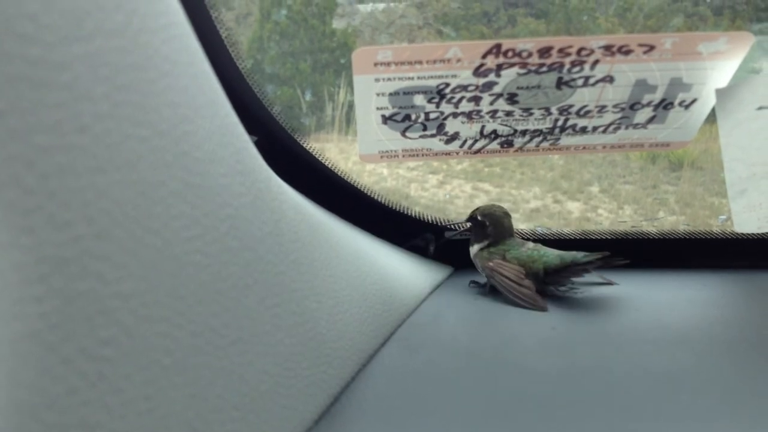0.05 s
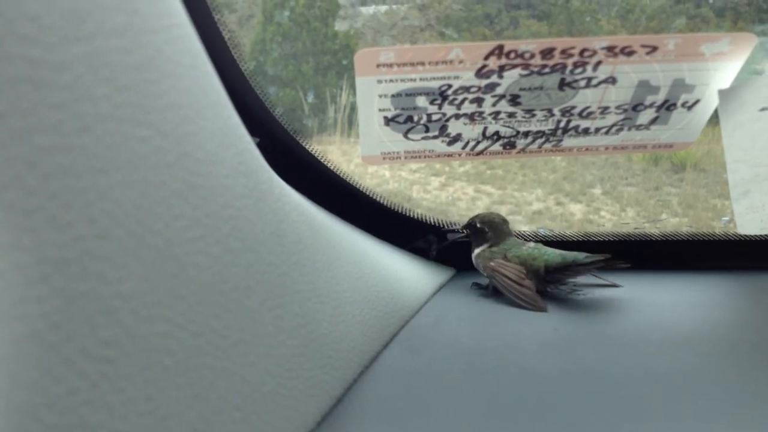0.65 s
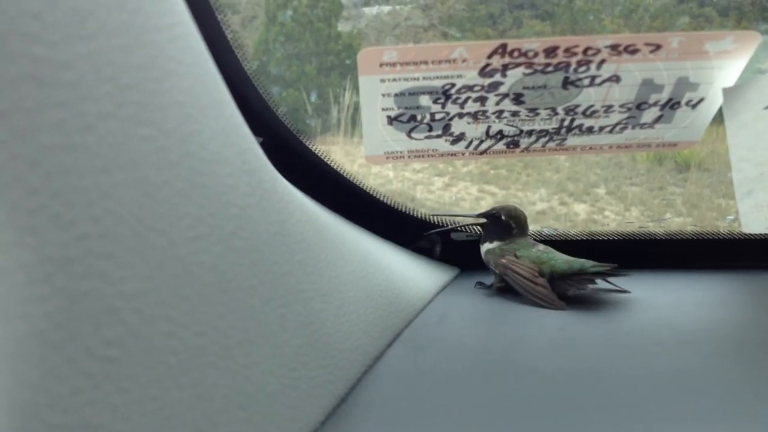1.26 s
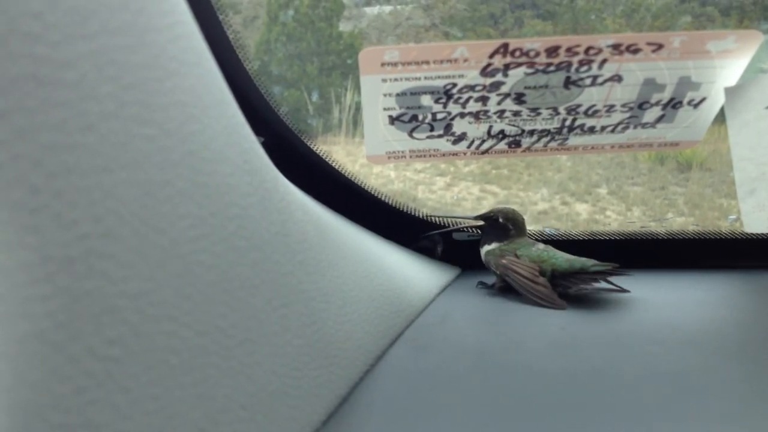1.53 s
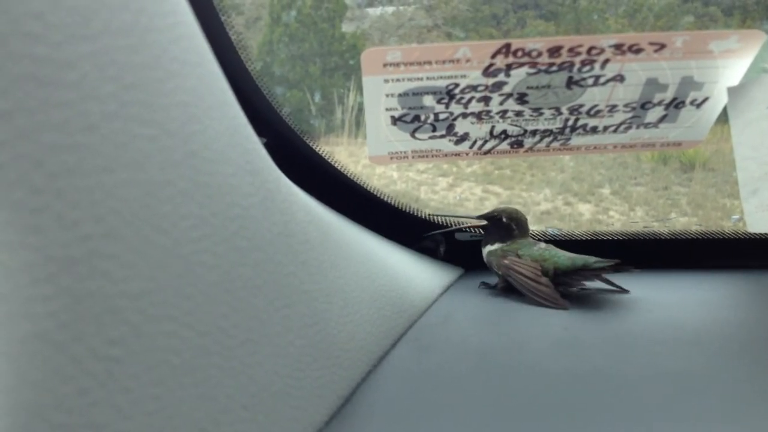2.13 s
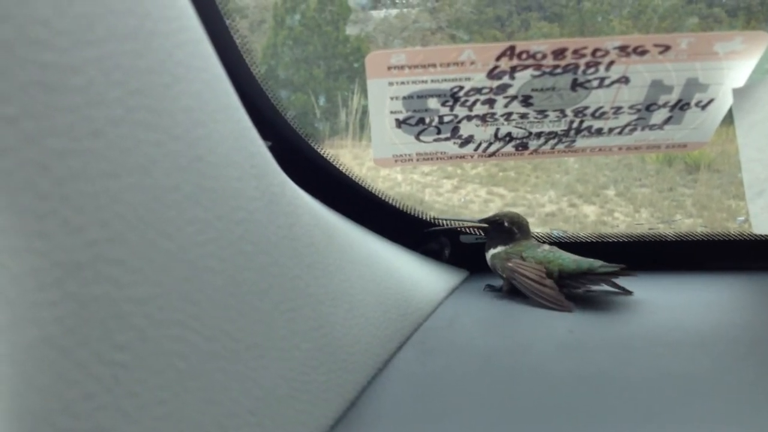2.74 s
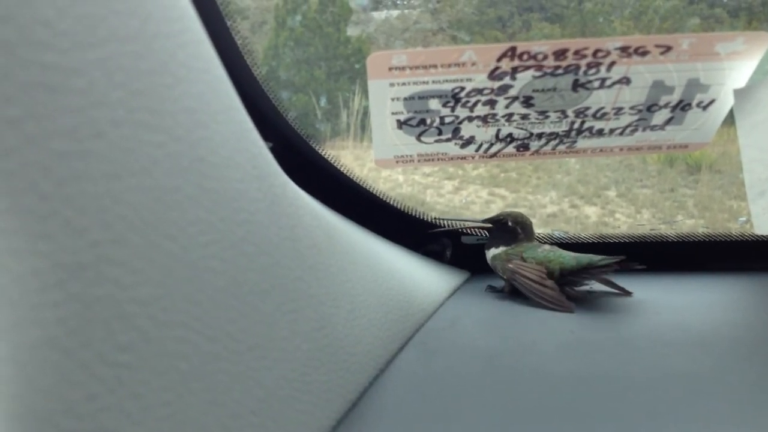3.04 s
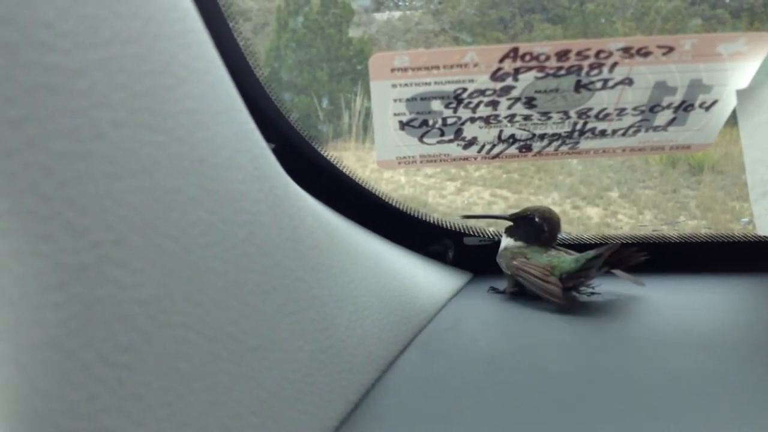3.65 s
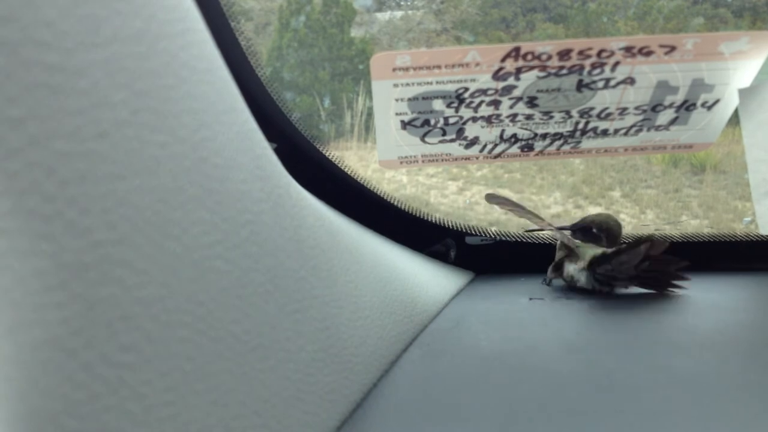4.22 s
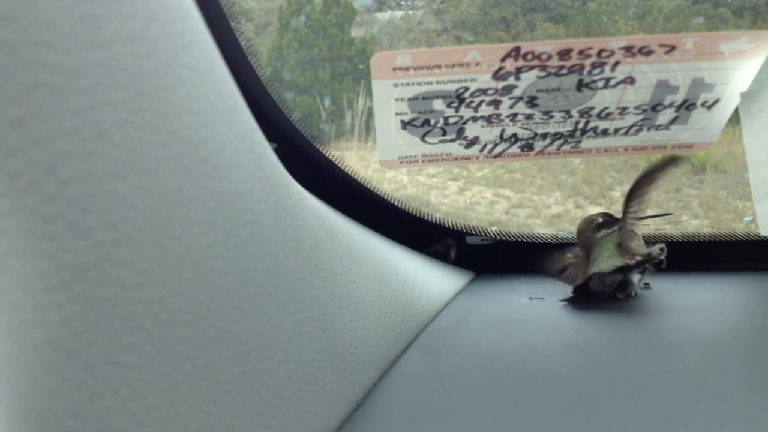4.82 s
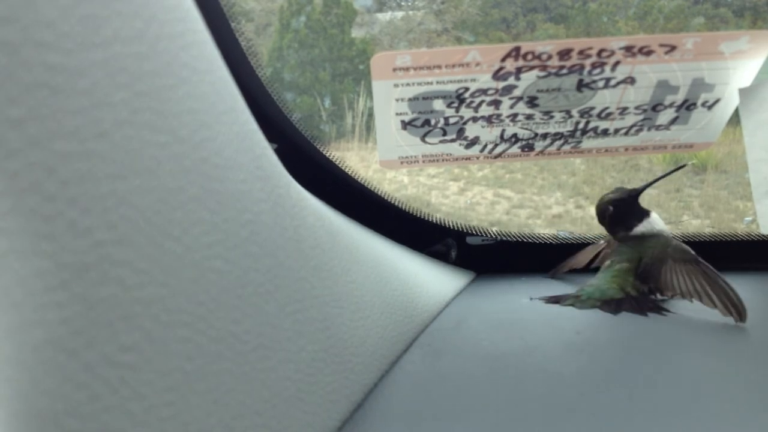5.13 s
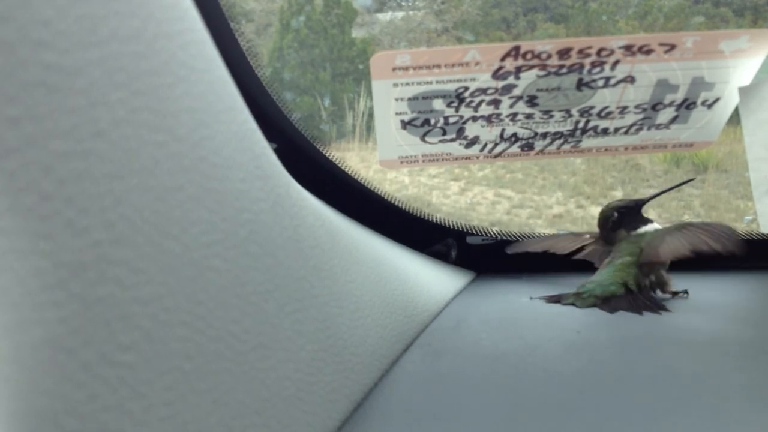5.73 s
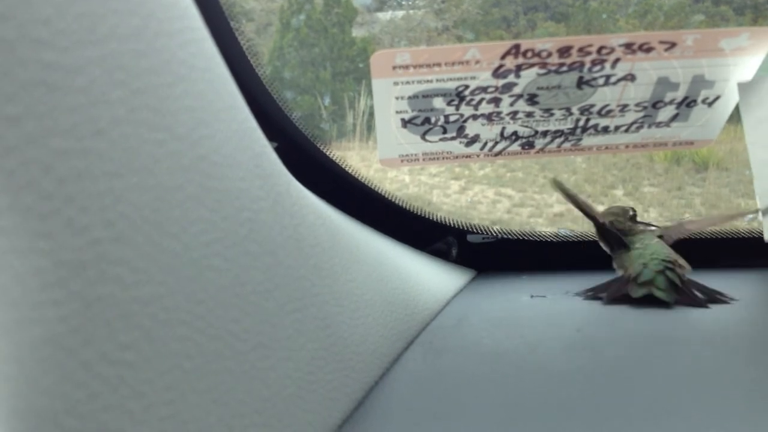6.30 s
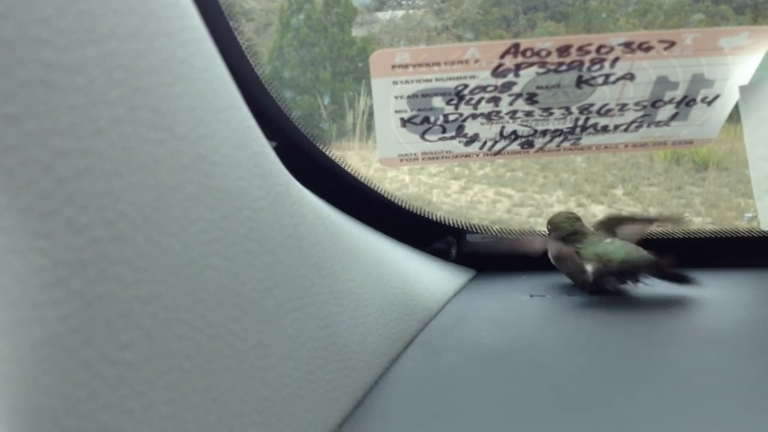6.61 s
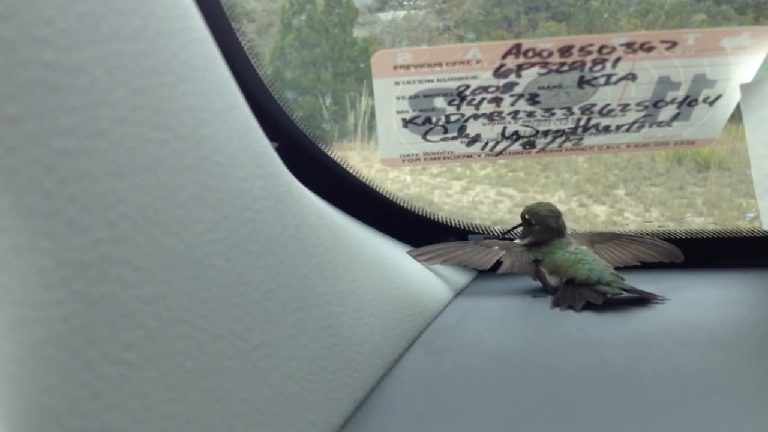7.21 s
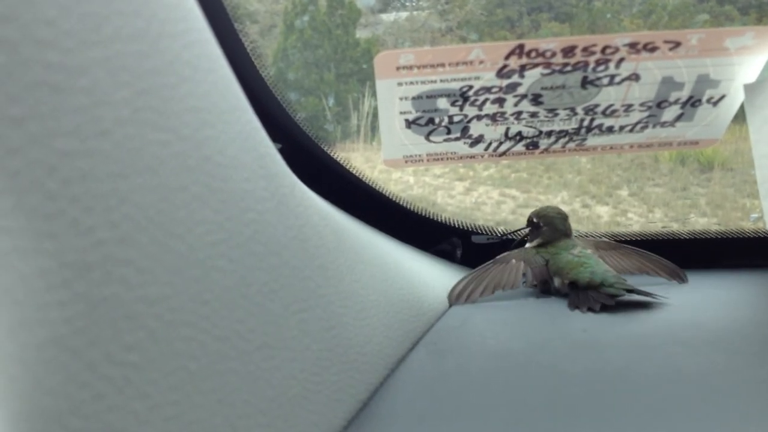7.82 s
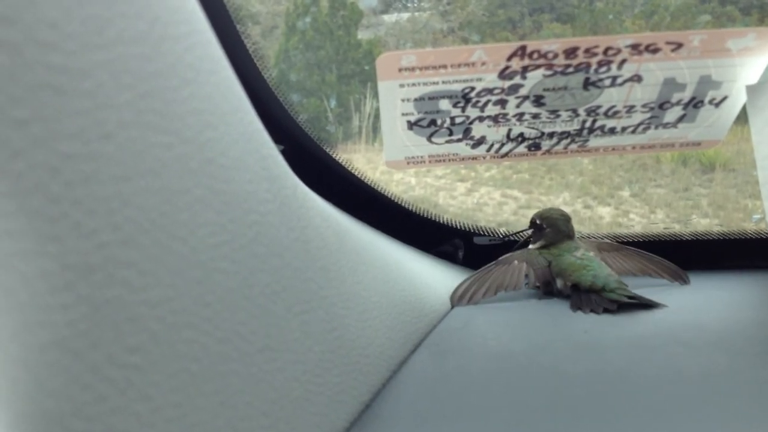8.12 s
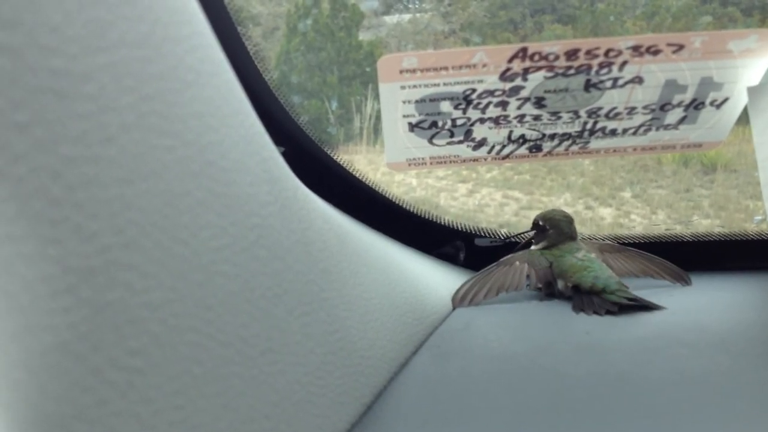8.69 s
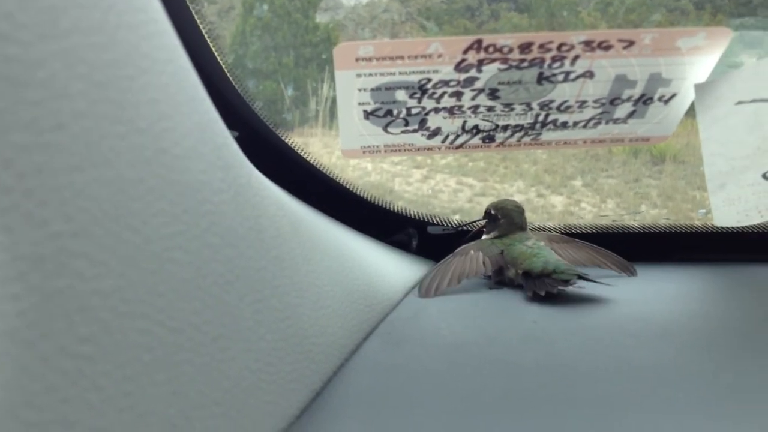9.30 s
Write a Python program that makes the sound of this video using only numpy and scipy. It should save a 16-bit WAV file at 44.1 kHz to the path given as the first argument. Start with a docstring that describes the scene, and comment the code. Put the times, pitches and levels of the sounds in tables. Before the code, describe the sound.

Faint birdsong outside a quiet car, then a trapped hummingbird flutters against plastic and glass in two bouts and settles.

```python
"""Inside a car, the microphone close to a hummingbird trapped behind the windscreen.
First a quiet outdoor rumble, songbirds outside smeared by the cabin, and a few faint rasps and chips.
Near four seconds the feathers shuffle and the bird beats its wings in bouts on the dashboard: each beat
hums and pushes air, feathers brush the trim on both strokes, wing tips and bill tap plastic and glass.
From about seven seconds it settles, and the songbirds outside carry on."""
import sys
import numpy as np
from scipy import signal
from scipy.fft import rfft, irfft
from scipy.io import wavfile
from scipy.ndimage import uniform_filter1d

SR = 44100
rng = np.random.default_rng(int(sys.argv[2]) if len(sys.argv) > 2 else 0)


def master(y):
    """Save y as 16-bit WAV."""
    cut = np.clip(np.atleast_2d(y).T, -1, 1)
    pcm = np.round(cut * 32767)  # scale
    wavfile.write(sys.argv[1], SR, pcm.astype(np.int16))


N = 421155
T = np.arange(N) / SR

# Hiss and rumble around the car, and the blur of far songs. Each row: frequency in Hz, relative dB.
HISS_COLOUR = [(25, -16.5), (80, -13.5), (118, -1.5), (150, -3.5), (210, 2), (290, -3), (520, -4.5),
               (1000, -7), (2400, -10), (2950, -10.5), (3600, -11), (7000, -12), (9900, -18), (13500, -13),
               (15400, -14.5)]
RUMBLE_COLOUR = [(40, -32), (90, -17.5), (125, -3), (210, 2), (320, -3), (600, -19), (2000, -20)]
CHORUS_COLOUR = [(1000, -31.5), (1700, -13), (2500, -11), (2850, 5), (3150, -10.5), (3700, -15),
                 (6000, -28.5)]
# How the rumble and the blur swell. Each row: time in seconds, level in dB.
RUMBLE_LEVEL = [(0, -79), (.7, -71.5), (1.5, -78), (2.3, -77.5), (3.2, -87), (5.5, -85), (7.4, -80),
                (9.5, -80.5)]
CHORUS_LEVEL = [(0, -87), (.8, -77.5), (2.2, -77.5), (3.2, -85.5), (6.9, -83.5), (7.4, -76), (8.3, -73.5),
                (8.8, -82)]

# Short notes near the car.
# Each row: start and length in seconds, first, middle and last pitch in Hz, mid-note level in dB.
NOTES = [(.02, 0.17, 2864, 2810, 2790, -75.5), (.11, .08, 4000, 3630, 3380, -77),
         (0.314, 0.063, 5150, 4980, 4914, -69.5), (0.446, 0.049, 4000, 3600, 3430, -72.5),
         (0.393, 0.0284, 2241, 2220, 2190, -65), (0.506, 0.0432, 2207, 2210, 2152, -56),
         (0.575, 0.0355, 2204, 2030, 2140, -60), (0.635, 0.018, 2093, 2180, 2264, -54),
         (1.268, 0.051, 2760, 3170, 3450, -62), (4.331, 0.0272, 3104, 3820, 2854, -54),
         (4.902, 0.03284, 5425, 6400, 5595, -58.5), (6.991, 0.031, 4310, 3750, 3420, -59),
         (8.869, 0.0312, 2698, 3700, 5310, -50.5), (8.916, 0.0317, 6600, 4700, 3070, -49),
         (9.084, 0.0284, 3152, 3780, 2722, -52.5), (9.084, .034, 1558, 1901, 1500, -71)]
# Thin rising chips, and the nearest bird's swooping calls. Each row: start in seconds, level in dB.
CHIPS = [(.873, -61.5), (.942, -58), (.952, -70), (.971, -63)]
SWOOPS = [(4.523, -49), (9.288, -50)]
# The swooping call, then the far syllables: a low warble, a dipping swing, a falling trill.
# Each row: seconds into the call, pitch in Hz, relative level in dB.
SWOOP_CONTOUR = [(0, 3321, 4), (.009, 4500, -7), (.021, 3070, -2), (.055, 2627, -9), (.085, 3216, 4),
                 (.122, 5011, -5), (.152, 4600, -1), (.19, 3434, -2.5), (.26, 2260, -9.5)]
WARBLE_CONTOUR = [(0, 1381, -2), (.06, 1602, -5), (.105, 1737, 0), (.15, 1730, -15.5), (.21, 1710, -3.5),
                  (.26, 1745, -2.5)]
SWING_CONTOUR = [(0, 2850, -3), (.035, 2050, -5), (.07, 2400, -2), (.11, 3099, 0)]
TRILL_CONTOUR = [(0, 3738, -8), (.018, 3006, 3), (.038, 2660, -12), (.058, 2621, 1.5)]
# Far phrases. Each row: start, syllable spacing and phrase length in seconds, level in dB.
WARBLE_PHRASES = [(.785, .325, 1.5, -73), (7.14, .315, 1.1, -74.5)]
SWING_PHRASES = [(.68, 0.123, .8, -71), (1.475, 0.154, .8, -72), (7.19, .315, 1.1, -72)]
TRILL_PHRASES = [(.946, .1163, 1.95, -71), (7.56, .114, 1.3, -74)]

# Faint rasps and feather shuffles, close by. Each row: start and length in seconds, level in dB.
RASPS = [(.553, 0.091, -59.5), (.67, 0.09, -63), (.797, 0.114, -65.5), (.95, 0.079, -61),
         (1.062, 0.079, -58.5), (1.385, 0.0694, -62)]
SHUFFLES = [(3.62, 0.37, -72), (4.87, 0.1203, -63.5), (5.03, 0.272, -70), (6.14, 0.107, -56.5),
            (6.36, 0.139, -52), (6.97, 0.369, -64.5), (7.408, 0.06, -64.5), (7.555, 0.051, -72.5)]
# Tone of the rasps, brushing feathers and pushed air. Each row: frequency in Hz, relative dB.
RASP_COLOUR = [(1500, -20.5), (3000, -3), (4500, -2), (6200, -5), (8000, 2.5), (10000, -3.5), (13000, -6.5),
               (15500, -16)]
FEATHER_COLOUR = [(300, -18), (1500, -5.5), (2500, -11), (2900, -5.5), (3600, -12.5), (4750, 4.5),
                  (5150, -5.5), (5550, 0.5), (6900, -8.5), (8400, -3), (10800, -9.5), (12500, -2),
                  (15000, -7)]
AIR_COLOUR = [(25, -13), (80, -24), (125, -3.5), (220, 1.5), (350, 3.5), (540, -4), (800, -5), (1600, -9),
              (2400, -21.5), (5000, -25.5)]
# Bursts of wingbeats.
# Each row: start, attack, hold and release in seconds, then hum, air and brushing levels in dB.
WING_BURSTS = [(3.764, 0.2218, 0.177, 0.0756, -39, -40.5, -38.5),
               (4.168, 0.0196, 0.0397, 0.0432, -55, -47.5, -44.5),
               (4.319, 0.03096, 0.145, 0.065, -79, -72.5, -59),
               (4.525, 0.0143, 0.01728, 0.0497, -68, -62, -58.5),
               (4.625, 0.10075, 0.0711, 0.1314, -56, -45, -41),
               (5.85, 0.0784, 0.0372, 0.0731, -61, -45, -40), (6.016, 0.01522, 0.0163, .04, -61, -50, -48),
               (6.095, 0.013, .015, 0.0602, -62, -49, -48),
               (6.202, 0.0344, 0.00548, 0.0431, -71, -53.5, -43.5),
               (6.29, 0.0226, 0.0156, 0.0859, -61, -48.5, -39.5),
               (6.455, .028, 0.00504, .06, -58, -47.5, -47),
               (6.554, 0.0251, 0.027, 0.0926, -57, -42.5, -38),
               (6.632, 0.0599, .005, 0.068, -49, -43, -41.5),
               (6.754, 0.01456, .015, 0.0708, -53.5, -42, -39.5),
               (6.813, 0.0179, 0.0805, 0.061, -60, -55.5, -50)]
# Harmonics of the wing hum. Each row: multiple of the beat rate, relative level in dB.
HUM_HARMONICS = [(1, -14), (2, -13), (3, 2), (4, -16.5), (5, -5), (6, -6), (7, -7.5), (8, -14.5), (9, -15),
                 (11, -16.5)]

# Clear taps on dashboard and glass.
# Each row: time in seconds, ring level in dB, then knock and tick in dB relative to the ring.
TAPS = [(3.794, -46.5, -8.5, -7.5), (3.8381, -44, -3.5, -3), (3.9034, -38, -11, -10),
        (3.932, -33.5, -16.5, -16.5), (4.0594, -27, -13.5, -25.5), (4.1832, -33, -7.5, 3),
        (4.1992, -34.5, -2.5, -1.5), (4.3846, -61, -12, 10.5), (4.4381, -51, -14, -8), (4.641, -48, 0, 0.5),
        (4.6552, -47, -3.5, 9.5), (4.6782, -49.5, -1, 9), (4.714, -36.5, -16, -8.5), (4.733, -37, -12.5, 3),
        (4.801, -37, -17, -13.5), (4.8453, -43, -1, -7), (5.7895, -53, -3, 3.5), (5.8113, -46.5, -19, -1.5),
        (5.828, -51.5, -1.5, 2.5), (5.8459, -45.5, -12.5, 0.5), (5.8666, -45.5, -1, 3.5),
        (5.89, -45.5, -1, 1.5), (5.9261, -37, -4.5, -7.5), (6.0069, -41, -7, -1.5), (6.031, -31, -6.5, 1),
        (6.0768, -54, 8, 6.5), (6.1098, -34.5, -2, -5), (6.1469, -36.5, -5.5, 3.5),
        (6.237, -42.5, -2.5, 13), (6.3, -36, -7, -3), (6.3158, -37, -9, 6.5), (6.335, -43, 3, 2),
        (6.461, -41, -5.5, -4.5), (6.482, -31, -16.5, -0.5), (6.5421, -32, -16, 1.5),
        (6.5826, -38.5, 6.5, 5.5), (6.6436, -40, 4, -9.5), (6.6962, -39, 3, 1), (6.7633, -36.5, -0.5, 1),
        (6.7731, -40, 5.5, 6), (6.8708, -41.5, -1.5, -8), (6.9014, -40, -12, -13), (6.93, -41, 1.5, 2),
        (6.9551, -36.5, -11, -4.5), (7.0433, -40, -12, 0.5), (7.5345, -77, 14.5, 20.5)]
# Modes of the tapped trim. Each row: frequency in Hz, seconds to fall 60 dB, relative level in dB.
TRIM_MODES = [(1075, 0.021, -9), (2915, 0.0079, -3), (4640, 0.0035, -39.5), (4784, 0.0144, 4.5),
              (4993, 0.00864, 5.5), (5374, 0.0075, 6.5), (5650, 0.0065, -17.5), (8000, .006, -2.5)]
# The panel's dull knock and the contact's bright tick. Each row: frequency in Hz, relative dB.
KNOCK_COLOUR = [(70, -39.5), (180, 2), (450, 5), (1100, 0), (1900, 2.5), (3200, -22), (6000, -16.5)]
TICK_COLOUR = [(2500, -29), (6000, -8), (8400, 0), (10800, -9), (12800, 2), (15000, -7)]


def undb(db):
    """Decibels to gain."""
    return np.exp(np.asarray(db) * (np.log(10) / 20))


def unit(x):
    """Scale to rms 1."""
    return x / np.sqrt(np.mean(x ** 2) + 1e-20)


def tap_energy(x):
    """Scale a short sound to the energy of 4 ms at rms 1."""
    return x * np.sqrt(.004 * SR) / np.linalg.norm(x)


def add(out, start, x):
    """Mix x into out from start, in seconds."""
    i = int(np.clip(start * SR, 0, N - 1))
    out[i:i + len(x)] += x[:N - i]


def colour(x, points, size=4096):
    """Minimum-phase filter of unit power through (Hz, dB) points."""
    hz, db = np.transpose(points)
    grid = np.maximum(np.arange(size // 2 + 1) * SR / size, 1)
    cepstrum = irfft(np.log(undb(np.interp(np.log(grid), np.log(hz), db))))
    cepstrum[1:size // 2] *= 2
    cepstrum[size // 2 + 1:] = 0
    response = irfft(np.exp(rfft(cepstrum)))
    return signal.fftconvolve(x, response / np.linalg.norm(response))[:len(x)]


def noise(points):
    """Steady coloured noise of rms near 1."""
    return colour(rng.standard_normal(N), points)


def walk(rate):
    """Smooth random drift of rms 1, changing rate times a second."""
    step = max(int(SR / rate), 1)
    held = np.repeat(rng.standard_normal(N // step + 1), step)[:N]
    return unit(uniform_filter1d(held, step))


def lag(x, seconds):
    """Follow x sluggishly, with the given time constant."""
    keep = np.exp(-1 / (seconds * SR))
    return signal.lfilter([1 - keep], [1, -keep], x)


def puffs(rows):
    """Envelope of short puffs that swell quickly and fade more slowly."""
    out = np.zeros(N)
    for start, length, db in rows:
        progress = np.linspace(0, 1, max(int(length * SR), 2))
        add(out, start, undb(db) * np.sin(np.pi * progress ** (2 / 3)))
    return out


def ambience(hiss_db=-69.5):
    """All round the car, an even hiss under a low rumble that swells slowly."""
    hiss = undb(hiss_db) * noise(HISS_COLOUR)
    swell = undb(np.interp(T, *np.transpose(RUMBLE_LEVEL)) + walk(6.8))
    return hiss + swell * noise(RUMBLE_COLOUR)


def far_chorus():
    """In the distance, songs blur into a soft ringing band."""
    return noise(CHORUS_COLOUR) * undb(np.interp(T, *np.transpose(CHORUS_LEVEL)) + 2.17 * walk(16))


def whistle(contour, quaver):
    """A bird note gliding through (seconds, Hz, dB) points, with a quaver and a weak overtone."""
    times, hz, db = np.transpose(contour)
    t = np.arange(times[0], max(times[-1], times[0] + .01), 1 / SR)
    unsteady = unit(uniform_filter1d(rng.standard_normal(len(t)), size=200))
    glide = uniform_filter1d(np.interp(t, times, hz), size=300, mode="nearest")
    pitch = glide * (1 + quaver * unsteady)
    phase = 2 * np.pi * np.cumsum(pitch) / SR
    overtone = undb(-12) / (1 + (pitch / 2300) ** 12)  # only low notes keep it
    envelope = np.sqrt(2) * undb(np.interp(t, times, db)) * signal.windows.tukey(len(t), .1)
    return envelope * (np.sin(phase) + overtone * np.sin(2 * phase))


def near_birds(note_fade_db=7, run_start_s=1.15, run_fade_db_per_s=9.5):
    """Just outside: single notes, two swooping calls, rising chips and a fading run of falling ones."""
    out = np.zeros(N)
    for start, length, first_hz, middle_hz, last_hz, db in NOTES:
        edge_db = db - note_fade_db
        bend = [(0, first_hz, edge_db), (length / 2, middle_hz, db), (length, last_hz, edge_db)]
        add(out, start, whistle(bend, quaver=.0161))
    for start, db in SWOOPS:
        add(out, start, undb(db) * whistle(SWOOP_CONTOUR, quaver=.016))
    for start, db in CHIPS:
        add(out, start, chip(db, length_s=.011, from_hz=5000, to_hz=7340))
    for start in np.arange(run_start_s, 1.9, .0718):
        db = -63.5 - run_fade_db_per_s * (start - run_start_s)
        add(out, start, chip(db, length_s=.019, from_hz=9400, to_hz=5546))
    return out


def rasps():
    """Faint raspy notes close by: puffs of bright noise with a fast flicker."""
    return noise(RASP_COLOUR) * puffs(RASPS) * undb(2.4 * walk(250))


def far_songs():
    """Far off, birds repeat their syllables, never quite alike."""
    out = np.zeros(N)
    scatter = [.003, 35, 1.5]  # seconds, Hz, dB
    for contour, phrases in ((WARBLE_CONTOUR, WARBLE_PHRASES), (SWING_CONTOUR, SWING_PHRASES),
                             (TRILL_CONTOUR, TRILL_PHRASES)):
        for start, spacing, length, db in phrases:
            for onset in np.arange(start, start + length, spacing):
                varied = np.array(contour) + rng.standard_normal((len(contour), 3)) * scatter
                add(out, onset, undb(db) * whistle(varied, quaver=.00785))
    return out


def chip(db, length_s, from_hz, to_hz):
    """A bird's chip: one short, rough sweep."""
    sweep = whistle([(0, from_hz, db), (length_s, to_hz, db)], quaver=.14)
    return sweep * np.sqrt(2 * np.hanning(len(sweep)))


def shuffles():
    """On the dashboard, the hummingbird's feathers shuffle softly."""
    return noise(FEATHER_COLOUR) * puffs(SHUFFLES) * undb(3.54 * walk(90))


def struggle(fastest_hz=64.784, slowest_hz=48, hz_per_db=.4178):
    """More effort, louder and faster beats; gives hum, air and brush gains and the running beat count."""
    hum, air, brush = np.zeros((3, N))
    for start, attack, hold, release, hum_db, air_db, brush_db in WING_BURSTS:
        corners = np.cumsum([0, attack, hold, release])
        effort = np.interp(np.arange(0, corners[-1], 1 / SR), corners, [0, 1, 1, 0]) ** 1.5
        add(hum, start, undb(hum_db) * effort ** 1.4)  # the hum grows faster than the effort
        add(air, start, undb(air_db) * effort)
        add(brush, start, undb(brush_db) * effort)
    drive = lag(hum + 1e-9, seconds=.07)  # the beat rate trails the effort
    beat_hz = np.maximum(fastest_hz + hz_per_db * 20 * np.log10(drive / drive.max()), slowest_hz)
    stumble = 1 + .012 * walk(70)  # contact with the dashboard unsettles the beat
    beats = np.cumsum(beat_hz * stumble) / SR
    settling = undb(-12.5) * lag(brush, seconds=.0613)  # feathers rustle on after each burst
    return hum, air, np.maximum(brush, settling), beats


def strokes(beats, sharpness, upstroke_db, scatter_db):
    """Two surges a wingbeat, down and up, uneven in strength."""
    stroke = np.floor(2 * beats).astype(int)
    chance = np.clip(rng.standard_normal(N // 100), -2, 1)  # a stroke may miss, but never stands far out
    strength = undb(scatter_db * chance[stroke] + upstroke_db * (stroke % 2))
    return unit(strength * np.abs(np.sin(2 * np.pi * beats)) ** sharpness)


def wings(hum_gain, air_gain, brush_gain, beats):
    """Close to the microphone, the wings hum, push puffs of air and drag feather barbs over the trim."""
    hum = np.zeros(N)
    for harmonic, db in HUM_HARMONICS:
        gain = undb(db + 2.62 * walk(60))
        phase = 2 * np.pi * (harmonic * beats + rng.random()) + .082 * harmonic * walk(80)
        hum += gain * np.sin(phase)
    rush = rng.standard_normal(N)
    push = unit(.5 + strokes(beats, sharpness=3.08, upstroke_db=0, scatter_db=5))
    air = colour(rush * push, AIR_COLOUR)
    barbs = unit(rng.standard_normal(N) * undb(3.68 * walk(1800)))
    drag = unit(.8 + strokes(beats, sharpness=5, upstroke_db=-2, scatter_db=2.5))
    brush = colour(barbs * drag, FEATHER_COLOUR)
    return undb(-.5) * unit(hum) * hum_gain + air * air_gain + brush * brush_gain


def taps(rows, lead_s=.012):
    """A feather shaft or the bill slides in, strikes and slides off; the trim rings, the panel knocks."""
    out, t = np.zeros(N), T[:2048]
    from_strike = np.abs(t - lead_s)
    contact = np.exp(-from_strike / .000861) + undb(-19.5) * np.exp(-from_strike / .00197)
    for time, db, knock_db, tick_db in rows:
        scuff = rng.standard_normal((3, len(t))) * contact
        detune = 1 + .0142 * rng.standard_normal(len(TRIM_MODES))  # each spot rings a little differently
        modes = sum(undb(mode_db) * np.sin(2 * np.pi * hz * shift * t) * np.exp(-np.log(1000) * t / t60)
                    for (hz, t60, mode_db), shift in zip(TRIM_MODES, detune))
        ring = tap_energy(signal.fftconvolve(scuff[0], modes)[:len(t)])
        knock = tap_energy(colour(scuff[1], KNOCK_COLOUR))
        tick = tap_energy(colour(scuff[2], TICK_COLOUR))
        add(out, time - lead_s, undb(db) * (ring + undb(knock_db) * knock + undb(tick_db) * tick))
    return out


def grazes(brush_gain, beats, share=.45, floor_db=-55.5, cap_db=-38.5, knock_db=-5, tick_db=-4.5):
    """A wing tip may catch the trim as a beat ends, harder with harder brushing; gives rows like TAPS."""
    beat_ends = np.flatnonzero(np.diff(np.floor(beats)))
    luck = rng.random(N // 500)
    scatter_db = 2 * rng.standard_normal((N // 500, 3))
    rows = []
    for i, draw, spread in zip(beat_ends, luck, scatter_db):
        db = 20 * np.log10(brush_gain[i] + 1e-9)
        if draw < share and db > floor_db:
            levels = spread + [min(db, cap_db), knock_db, tick_db]
            rows.append((T[i], *levels))
    return rows


def cabin(x, t60, wet_db, gap_s=.002):
    """Direct sound plus the dense, quickly dying reflections off glass and trim."""
    t = T[:SR // 2]
    tail = rng.standard_normal(len(t)) * np.exp(-np.log(1000) * t / t60) * (t > gap_s)
    echo = signal.fftconvolve(x, tail / np.linalg.norm(tail))[:N]
    wet = undb(wet_db)
    return (x + wet * echo) / np.hypot(1, wet)


def scene():
    """One microphone in the cabin: calls from outside arrive mostly as echo, the hummingbird nearly dry."""
    outside = ambience()
    songs = far_songs()
    outside += far_chorus()
    outside += cabin(near_birds(), t60=.15, wet_db=3, gap_s=.005)
    outside += cabin(songs, t60=.3, wet_db=3)
    close = shuffles() + rasps()
    hum_gain, air_gain, brush_gain, beats = struggle()
    close += wings(hum_gain, air_gain, brush_gain, beats)
    close += taps(list(TAPS) + grazes(brush_gain, beats))
    return (cabin(close, t60=.061, wet_db=-11.5) + outside)[None]


def record(dry, bass_hz=85, top_hz=15450):
    """The small microphone loses the deep bass; the recorder cuts the top steeply."""
    thin = signal.sosfilt(signal.butter(3, bass_hz, "high", fs=SR, output="sos"), dry)
    return signal.sosfilt(signal.ellip(10, .2, 70, top_hz, fs=SR, output="sos"), thin)


dry = scene()
out = record(dry)
master(out)
```